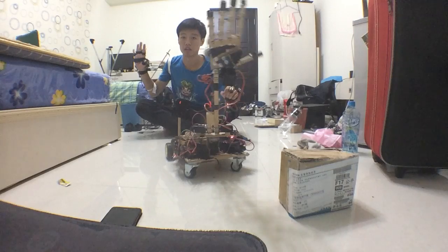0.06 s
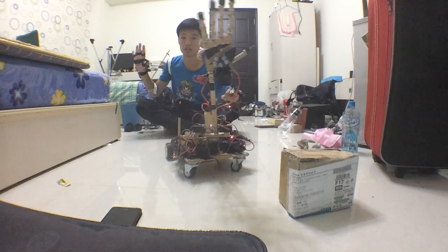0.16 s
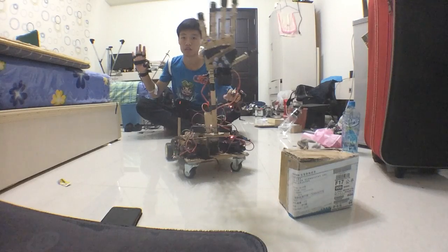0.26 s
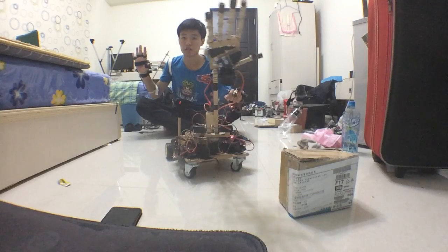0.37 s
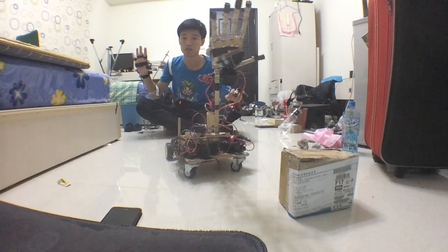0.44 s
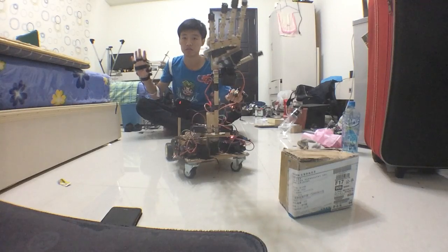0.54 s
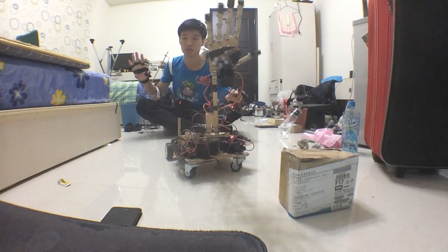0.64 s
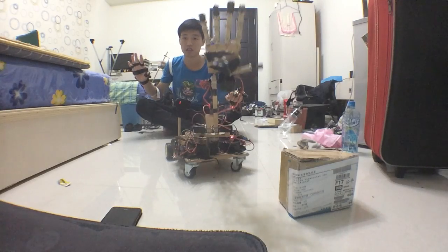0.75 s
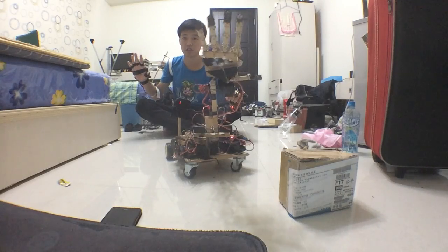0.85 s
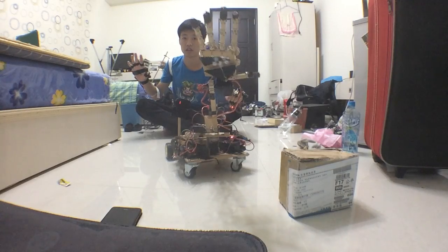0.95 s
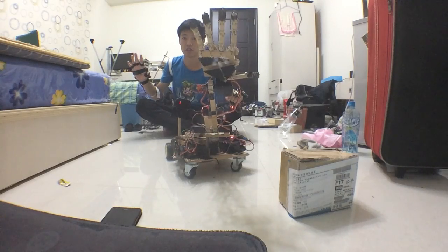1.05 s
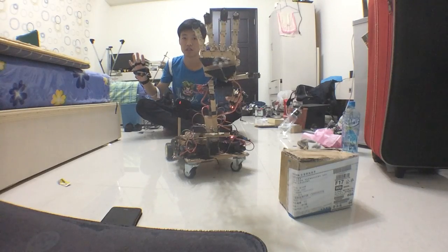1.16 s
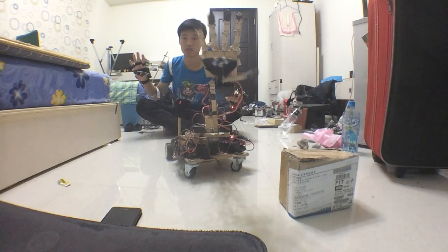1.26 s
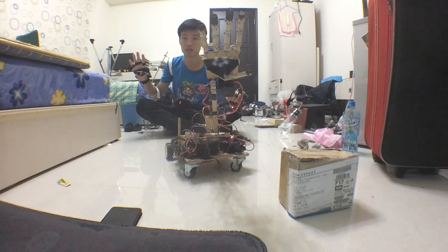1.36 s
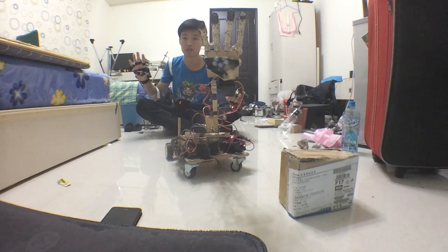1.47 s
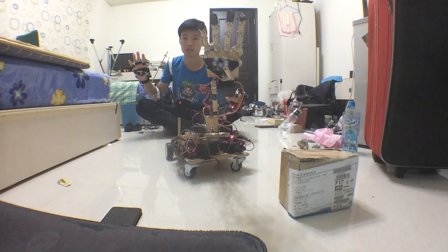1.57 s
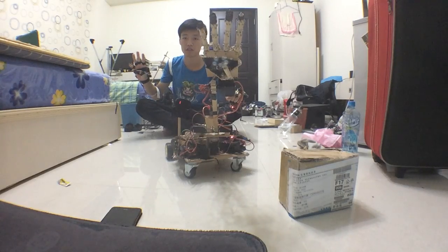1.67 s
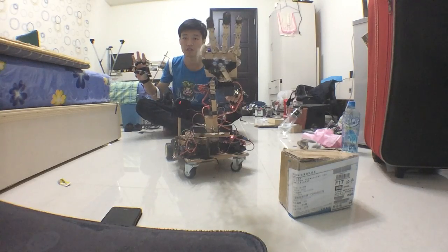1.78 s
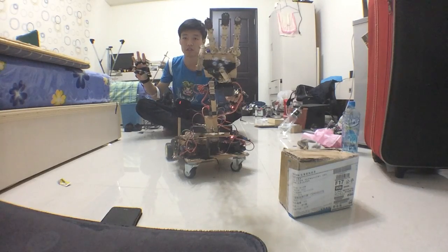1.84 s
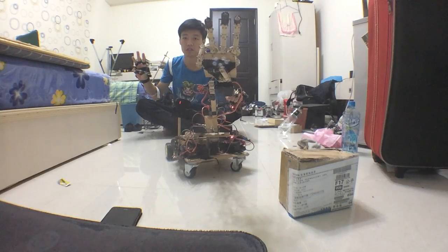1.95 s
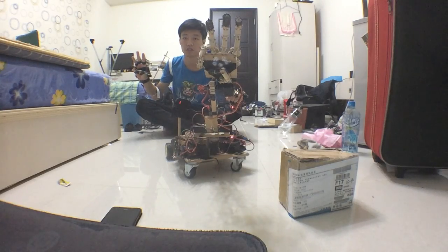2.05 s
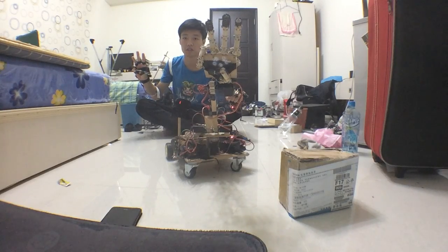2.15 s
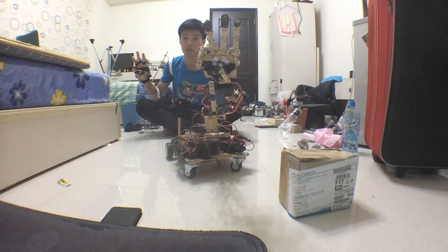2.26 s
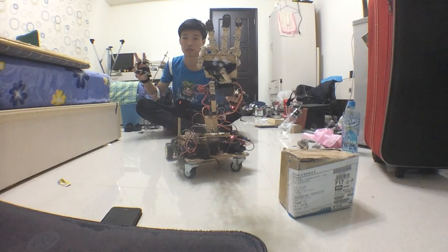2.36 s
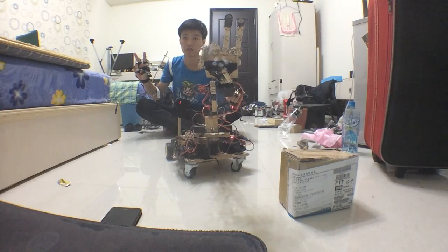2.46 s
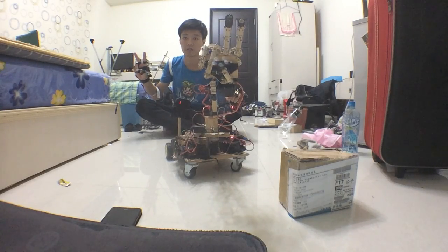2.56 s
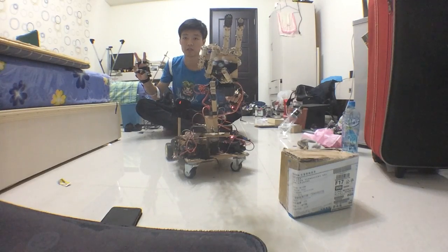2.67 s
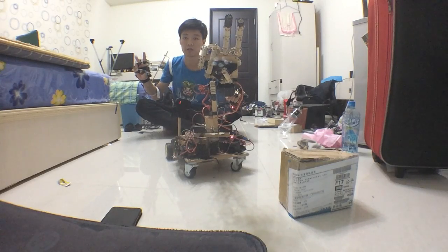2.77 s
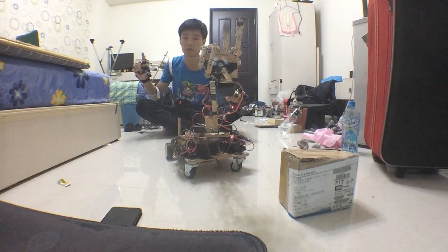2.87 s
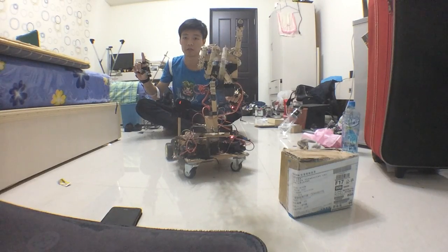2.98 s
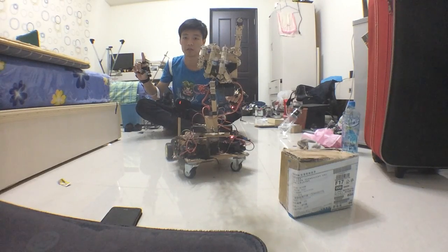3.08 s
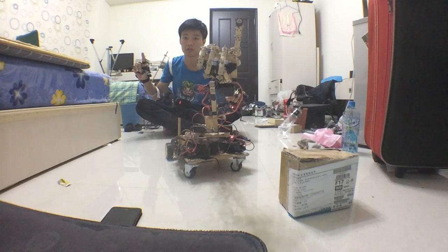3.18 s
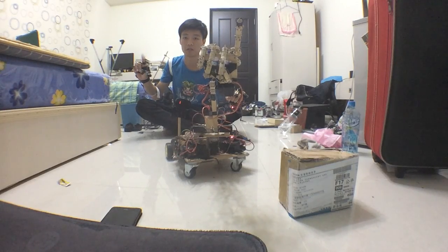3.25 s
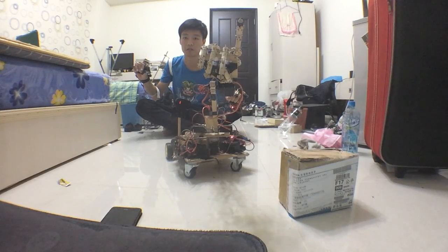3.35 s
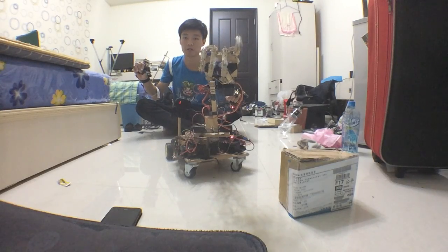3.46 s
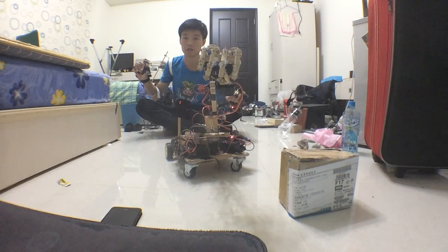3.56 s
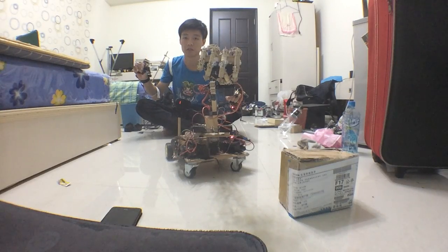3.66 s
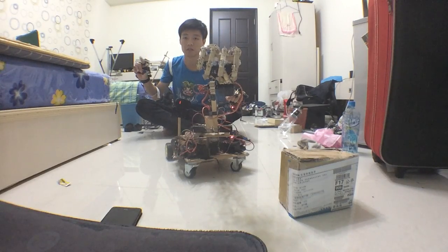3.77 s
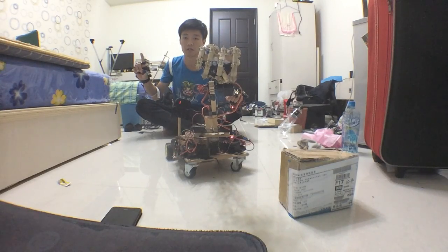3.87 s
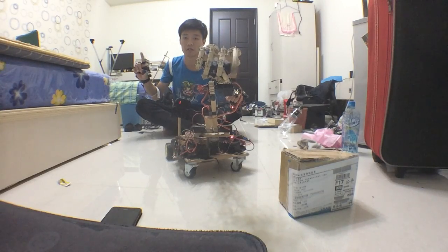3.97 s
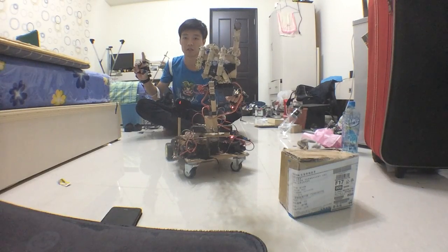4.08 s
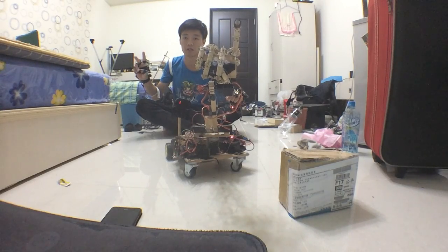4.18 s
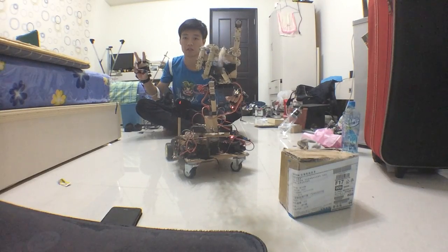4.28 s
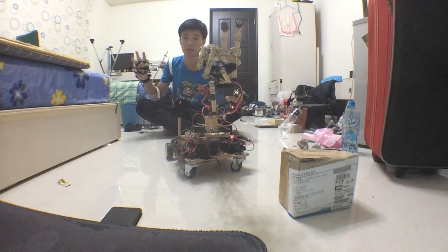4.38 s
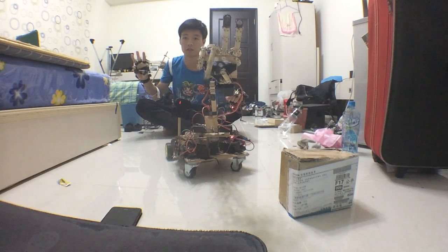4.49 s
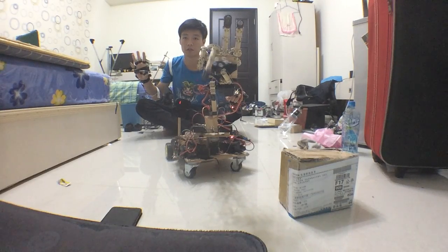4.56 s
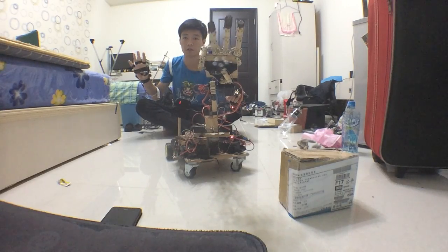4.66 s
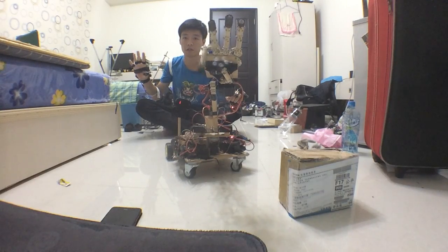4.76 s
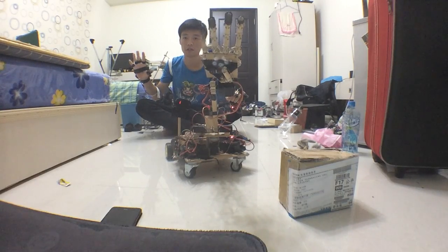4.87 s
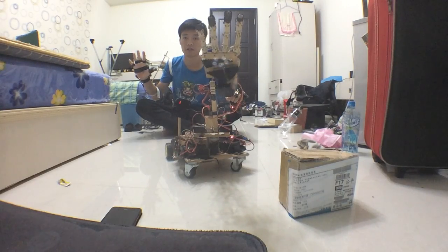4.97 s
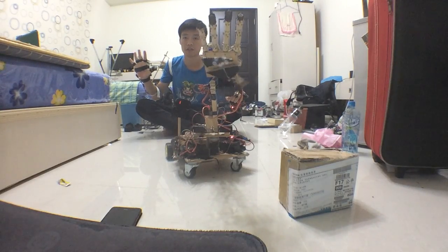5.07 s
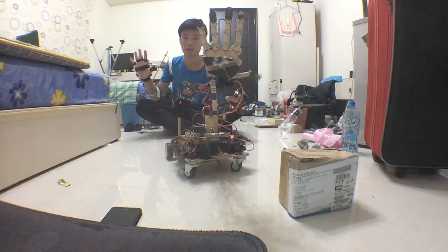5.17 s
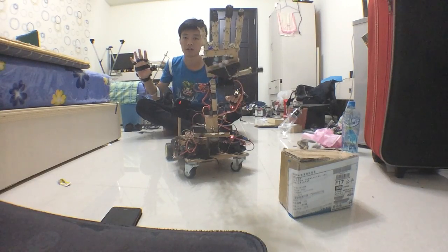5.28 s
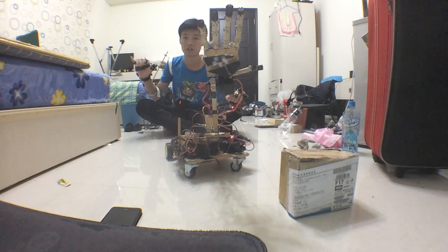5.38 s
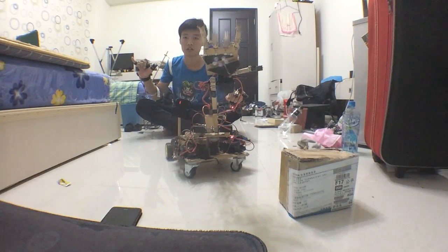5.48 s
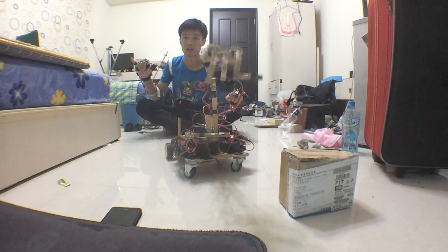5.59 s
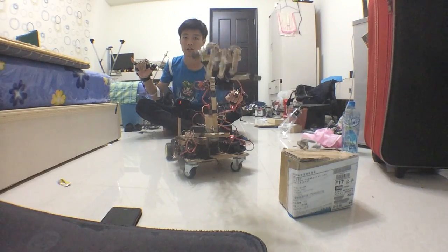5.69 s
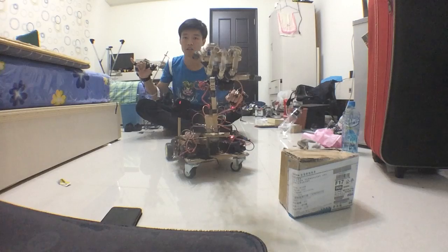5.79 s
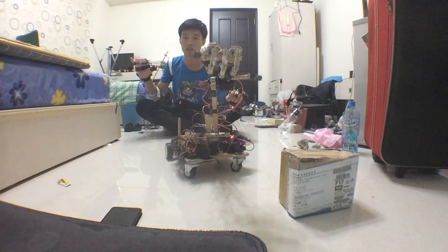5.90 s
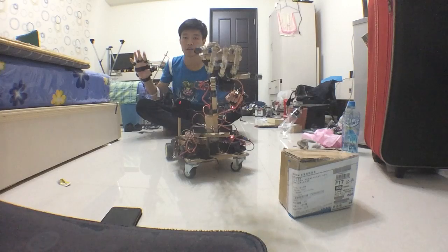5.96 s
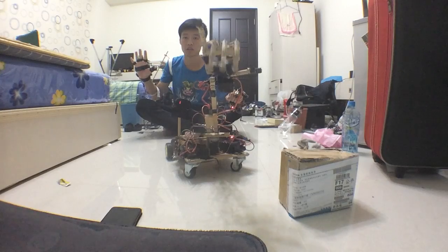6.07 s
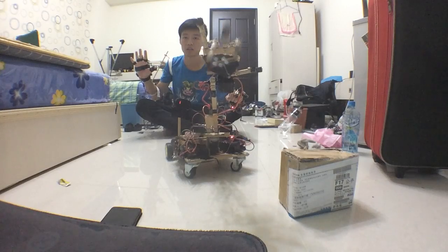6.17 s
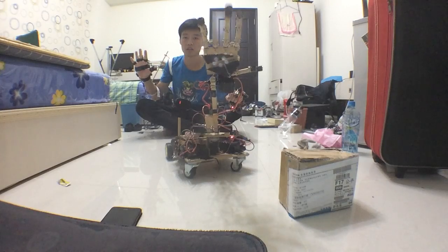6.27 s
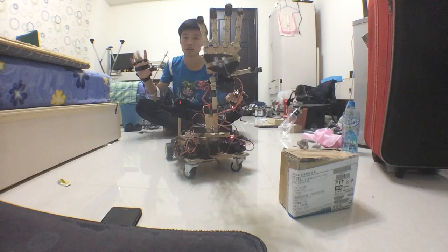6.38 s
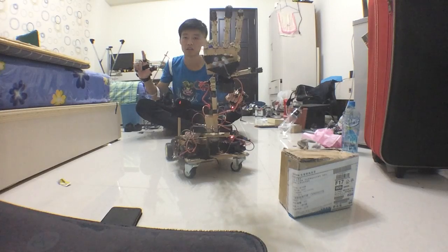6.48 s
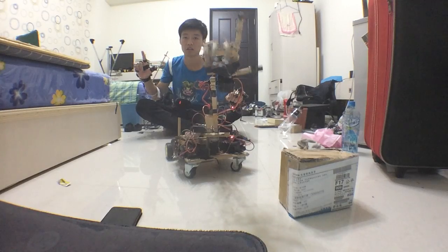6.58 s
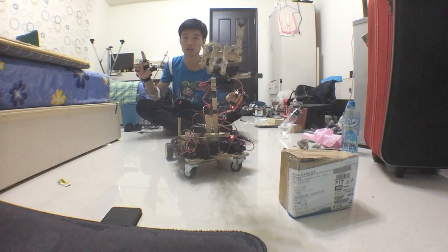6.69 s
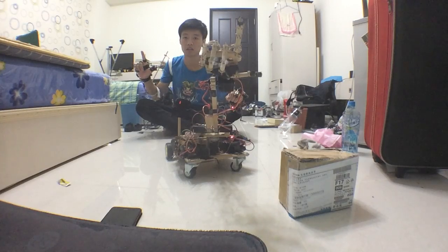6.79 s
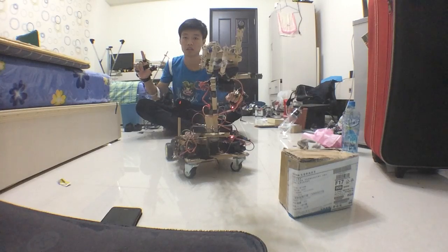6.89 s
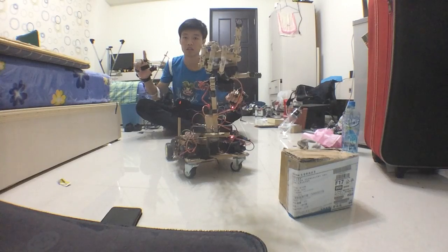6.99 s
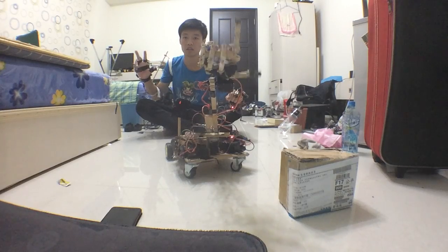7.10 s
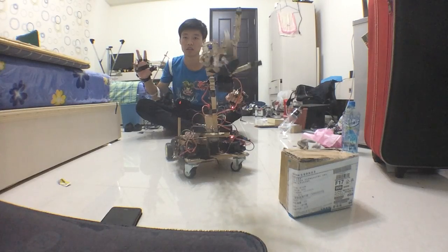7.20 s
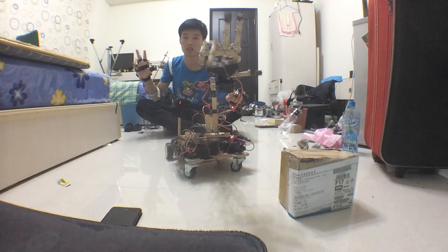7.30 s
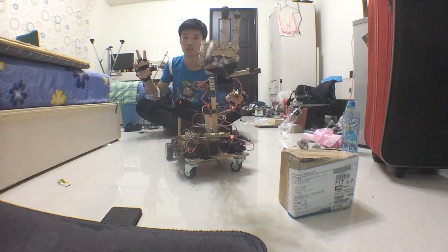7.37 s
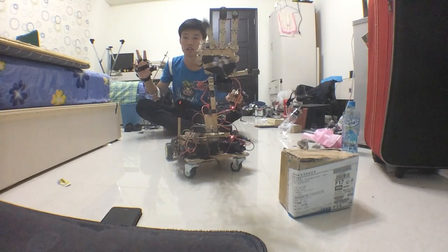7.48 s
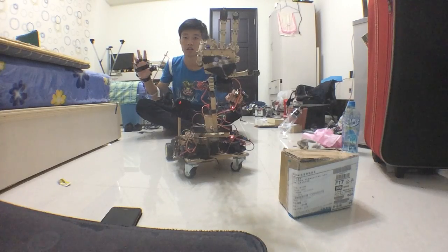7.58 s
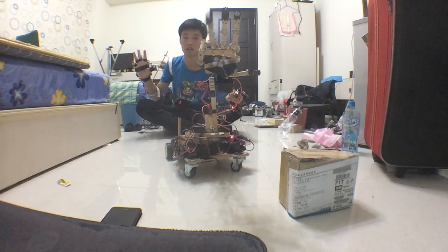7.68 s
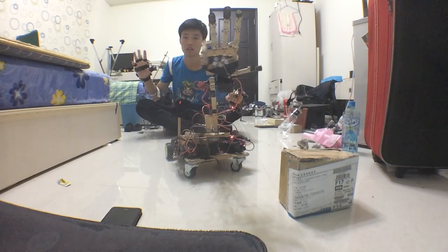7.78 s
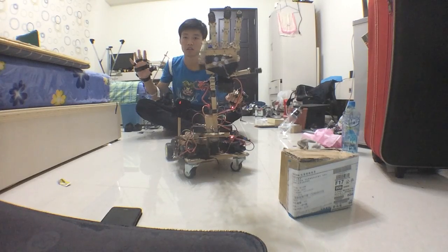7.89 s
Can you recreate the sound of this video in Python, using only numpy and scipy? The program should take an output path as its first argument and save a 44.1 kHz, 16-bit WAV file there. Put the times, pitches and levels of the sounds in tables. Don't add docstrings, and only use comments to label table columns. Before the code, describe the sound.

Small plastic servo gears chatter and whine in short irregular bursts, with sharp clicks and tiny squeaks, over a soft steady fan in a bedroom.

```python
import sys
import numpy as np
from scipy import signal
from scipy.fft import rfft, irfft, next_fast_len
from scipy.io import wavfile

SR = 44100
rng = np.random.default_rng(int(sys.argv[2]) if len(sys.argv) > 2 else 0)


def log_audio(samples):
    frames = np.atleast_2d(samples).T
    limited = np.clip(frames, -1, 1)
    pcm = np.round(limited * 32767).astype(np.int16)
    wavfile.write(sys.argv[1], SR, pcm)


def to_linear_factor(level_db):
    exponent = np.asarray(level_db, float) / 20
    return 10 ** exponent


N = 350154
ROTOR_HZ = 71.6


def rms_one(x):
    return x / np.sqrt(np.mean(x ** 2) + 1e-20)


def drift(rate):
    r = np.exp(-40 * np.pi * rate / SR)
    noise = rng.standard_normal(N // 20 + 2002)
    slow = signal.lfilter([1], [1, -2 * r, r * r], noise)[2000:]
    return np.interp(np.arange(N) / 20, np.arange(len(slow)), rms_one(slow))


def colour(x, spectrum):
    size, points = next_fast_len(N), np.array(spectrum)
    hz = np.maximum(np.fft.rfftfreq(size, 1 / SR), 1)
    curve_db = np.interp(np.log(hz), np.log(points[:, 0]), points[:, 1])
    return irfft(rfft(x, size) * to_linear_factor(curve_db), size)[:N]


def resonate(x, hz, width_hz):
    r = np.exp(-np.pi * width_hz / SR)
    top = (1 - r * r) / 2 * np.array([1, 0, -1])
    return signal.lfilter(top, [1, -2 * r * np.cos(2 * np.pi * hz / SR), r * r], x)


def band(x, low_hz, high_hz):
    return signal.sosfilt(signal.butter(3, [low_hz, high_hz], "band", fs=SR, output="sos"), x)


def swell(start, length, first_hz, last_hz, db, edge_db):
    u = np.linspace(0, 1, 9)
    glide_hz = first_hz + (last_hz - first_hz) * u
    return np.transpose([start + length * u, glide_hz, db - edge_db * (2 * u - 1) ** 2])


# pitch_hz, level_db (per Hz)
FAN_HISS = [(12, -29), (20, -12), (91, -2), (209, -16), (251, -10), (323, -13.5), (545, -15.5),
            (905, -15.5), (1030, -18), (1320, -21), (1500, -29), (1950, -56), (3300, -120)]
# pitch_hz, width_hz, level_db (rms)
FAN_HUMS = [
    (81.5, 9.3, -55.5),
    (117.1, 15, -63.5),
    (195.7, 26, -64),
    (520.7, 17.4, -68.5),
    (591, 14.3, -69.5),
]
# pitch_hz, level_db (per Hz)
FAN_UPPER_HISS = [(880, -17), (1500, -4), (2260, -7), (2910, -7.5), (3940, -6), (4300, -6.5), (4880, -8),
                  (7790, -13), (14100, -20.5), (15400, -17)]


def fan():
    hiss = colour(rng.standard_normal(N), FAN_HISS)
    hiss_db = -48.5 - 5.5
    hiss = to_linear_factor(hiss_db) * hiss / np.std(band(hiss, 20, 1100))
    hums = np.zeros(N)
    for hz, width_hz, db in FAN_HUMS:
        once = resonate(rng.standard_normal(N), hz, width_hz)
        hums += to_linear_factor(db) * rms_one(resonate(once, hz, width_hz))
    core_phase = 2 * np.pi * np.cumsum(196 + 0.813 * drift(1.8)) / SR
    core = to_linear_factor(-58 + 2.0 * drift(2.8)) * np.sin(core_phase)
    fizz = rms_one(colour(rng.standard_normal(N), FAN_UPPER_HISS))
    upper = to_linear_factor(-57.5 + 1.15 * drift(8)) * fizz
    return hiss + hums + core + upper


# start_s, length_s, first_hz, last_hz, peak_db
CLOTH = [
    (.02, 0.19, 630, 520, -55),
    (0.168, .13, 380, 310, -54),
    (.66, 0.161, 230, 300, -53),
    (0.721, 0.36, 579, 689, -55.5),
    (.98, .4, 350, 300.3, -59),
]


def rustle():
    out, s = np.zeros(N), np.arange(N) / SR
    lump = rms_one(band(rng.standard_normal(N), 10.0, 81))
    swish = rms_one(band(rng.standard_normal(N), 130, 1900))
    for row in CLOTH:
        times, hz, db = swell(*row, edge_db=9.5).T
        span = slice(int(times[0] * SR), int(times[-1] * SR))
        centre = np.sin(2 * np.pi * np.cumsum(np.interp(s[span], times, hz)) / SR)
        rub = .95 * lump[span] * centre + 0.66 * swish[span]
        out[span] += to_linear_factor(np.interp(s[span], times, db)) * rub
    return to_linear_factor(2.1 * drift(31)) * out


def bedroom(x):
    t60_s, room_db, wall_cut_hz = 0.4, -7.5, 7700
    size = next_fast_len(N + SR)
    w = 2 * np.pi * np.fft.rfftfreq(size)
    dull = 1 / np.sqrt(1 + (w * SR / (2 * np.pi * wall_cut_hz)) ** 2)
    tail = 0
    for k, lag in enumerate(rng.uniform(.011, .04, 12) * SR):
        loop = to_linear_factor(-60 * lag / SR / t60_s / dull) * np.exp(-1j * w * np.round(lag))
        tail = tail + (-1) ** k * loop / (1 - loop) / np.sqrt(12)
    bounce = to_linear_factor(-13.0) * np.exp(-1j * w * .0022 * SR)
    return irfft(rfft(x, size) * (1 + bounce + to_linear_factor(room_db) * tail), size)[:N]


# time_s, peak_db, ring_hz, low_part_db (relative)
JOINT_TICKS = [(0.5546, -46, 6300, -10), (1.0873, -33, 6030, -26), (1.6016, -23, 6080, -28),
               (1.645, -25, 6670, -28), (2.1077, -26, 5630, -31), (2.216, -37.5, 6570, -18),
               (2.353, -38.5, 5760, -21), (2.4202, -39, 5540, -17), (2.7581, -34, 5020, -23),
               (2.7994, -43, 5100, -19), (2.8654, -44, 6200, -14), (3.0894, -23, 6120, 3),
               (3.18, -33, 6070, -25), (3.4876, -24.5, 6400, -10), (4.583, -29, 4900, -24),
               (4.6239, -25, 4830, -29), (5.1082, -6.3, 4330, -31), (5.1892, -17.5, 7000, -16),
               (5.2489, -10, 4140, -28), (5.2913, -20, 6660, -22), (6.0544, -33, 6560, -19),
               (6.541, -41, 6210, -17), (6.908, -30, 5600, -12), (7.021, -42, 4700, -8),
               (7.0539, -40, 4200, -8), (7.073, -43, 4800, -8), (7.64, -39, 6600, -2),
               (7.6854, -39.5, 6150, -2), (7.729, -29, 6020, -19)]


def ticks():
    out, t = np.zeros(N), np.arange(800) / SR
    draws = rng.standard_normal((len(JOINT_TICKS), len(t)))
    scrape = np.minimum(t / 0.0006, 1) * np.exp(-t / 0.0012) + 0.13 * np.exp(-t / 0.011)
    for (start, db, hz, low_db), noise in zip(JOINT_TICKS, draws):
        contact = noise * scrape
        ring = resonate(contact, hz, 1330) + to_linear_factor(low_db) * band(contact, 2300, 4900)
        tip = .5 * resonate(contact, 6300, 1180) + 0.17 * band(contact, 11600, 12700)
        ring = band(ring + to_linear_factor(0.5 * (db - 4)) * tip, 1900, 14500)
        at = int((start + .0005) * SR)
        out[at:at + len(t)] += to_linear_factor(db) * ring / np.abs(ring).max()
    return out


# middle_s, length_s, first_hz, last_hz, peak_db
CORD_SQUEAKS = [(3.044, 0.00695, 2000, 2270, -29.5), (3.046, .03, 1700, 1750, -44),
                (3.089, 0.02, 2900, 2530, -33), (3.115, 0.016, 2750, 2700, -45),
                (5.606, .02, 1100, 2400, -45), (5.618, 0.021, 1820, 2360, -34),
                (5.661, .014, 2740, 2300, -34.5), (5.566, .02, 4000, 3850, -31.5),
                (6.679, 0.02, 1810, 2330, -33.5), (6.723, 0.013, 2600, 2820, -33.5),
                (6.749, 0.013, 2400, 2800, -41), (6.664, .02, 4300, 3600, -36),
                (4.45, 0.13, 1230, 1000, -52), (4.72, 0.069, 2720, 2700, -52.5)]


def squeaks():
    out = np.zeros(N)
    for middle, length, first_hz, last_hz, db in CORD_SQUEAKS:
        n = int(length * SR)
        tone = np.sin(2 * np.pi * np.cumsum(np.linspace(first_hz, last_hz, n)) / SR)
        at = int((middle - length / 2) * SR)
        out[at:at + n] += to_linear_factor(db) * np.hanning(n) * tone
    return out * to_linear_factor(2.5 * drift(45))


# start_s, length_s, first_hz, last_hz, peak_db
SHORT_WHINES = [(2.96, .06, 3180, 3200, -43), (3.1, .05, 4040, 3950, -35.5),
                (3.135, 0.066, 3260, 3500, -42), (4.5, .18, 2380, 2430, -37),
                (4.63, .08, 3930, 3970, -38.5), (2.5, .22, 3330, 3200, -45), (5.72, .13, 3120, 2970, -44),
                (6.77, .06, 3160, 3110, -47), (2.52, .23, 1890, 1790, -52.5), (4.8, .2, 1930, 1900, -56),
                (5.54, .17, 1950, 1930, -45), (7.25, 0.14, 1940, 1930, -43.5), (3.94, .33, 1740, 1670, -54),
                (3.48, .28, 1680, 1640, -59), (1.3, .36, 2330, 2330, -45), (4.07, .13, 5150, 5050, -52),
                (3.465, .085, 3200, 3280, -41), (3.54, .09, 3650, 3800, -50), (3.68, .06, 3700, 3650, -53)]
# time_s, pitch_hz, level_db
LONG_WHINE = [
    (3.94, 3200, -53),
    (3.99, 3650, -51),
    (4.05, 3560, -43.5),
    (4.16, 3310, -46.5),
    (4.2, 3100, -46),
    (4.25, 2950, -55),
]


def whines():
    out, s = np.zeros(N), np.arange(N) / SR
    waver, flicker = 1 + .026 * drift(450), to_linear_factor(4 * drift(70))
    glides = [(swell(*row, edge_db=13.5), -23.5) for row in SHORT_WHINES] + [(LONG_WHINE, -17)]
    for rows, side_db in glides:
        times, hz, db = np.transpose(rows)
        span = slice(int(times[0] * SR), int(times[-1] * SR))
        phase = 2 * np.pi * np.cumsum(np.interp(s[span], times, hz) * waver[span]) / SR
        tone = np.sin(2 * phase) + to_linear_factor(side_db) * (np.sin(phase) + 2 * np.sin(3 * phase))
        out[span] += np.sqrt(2) * to_linear_factor(np.interp(s[span], times, db)) * tone
    return out * flicker * to_linear_factor(3.6 * np.sin(2 * np.pi * ROTOR_HZ * s))


# spin_up_s, frame_db, case_db, tooth_tips_db (all relative), frame_easing_db
SERVO_TONES = [
    (.02, 2, -2.5, -9.5, 0),
    (.02, -6.5, -6, -16, -1),
    (.022, -14.5, -7, -5, 3),
    (.03, -11, 5.5, -1.5, 2),
    (.03, -7, -5, -5.5, 1.5),
    (.04, -12, -5.5, -2, -0.5),
    (.06, -4.5, -2, -2.5, 7.5),
]
# start_s, stop_s, first_db, last_db, coast_s
WRIST_MOVES = [(0.048, 0.204, -52.5, -47, .05), (.2, 0.472, -56.5, -56, 0.12), (0.543, .57, -51, -53, 0.11),
               (0.604, .64, -54, -50.5, 0.17), (5.305, 5.497, -50.5, -59, .05)]
# start_s, stop_s, first_db, last_db, coast_s
ARM_MOVES = [(0, .05, -53, -53, .1), (.55, .72, -58, -53, .03), (0.716, 0.884, -40.5, -44, .22),
             (3.35, 3.45, -66, -64, .05), (3.45, 3.48, -53, -48, .03), (3.86, 3.92, -65, -60, .05),
             (5.99, 6.037, -60, -57, .03), (6.045, 6.074, -39, -45, .03), (6.51, 6.56, -53, -51, .03),
             (7.1, 7.183, -64, -60, .03), (7.18, 7.2, -55, -52, .02), (7.62, 7.718, -60, -58, .03)]
# start_s, stop_s, first_db, last_db, coast_s
THUMB_MOVES = [(1.294, 1.635, -34, -41.5, 0.045), (1.387, 1.43, -35.5, -35, 0.11),
               (1.792, 1.85, -43, -47, .05), (2.1, 2.114, -37, -39, .04), (3.06, 3.186, -39.5, -33, .012),
               (4.632, 4.695, -35.5, -36.5, 0.12), (5.104, 5.3, -35.5, -31, .012),
               (5.68, 5.8, -38, -40, .08), (6.25, 6.38, -40, -37, .1), (6.718, 6.81, -39, -38.5, .12),
               (7.336, 7.47, -41, -42, .08)]
# start_s, stop_s, first_db, last_db, coast_s
INDEX_MOVES = [(1.8, 1.86, -50, -52, .05), (1.97, 2.09, -50, -47, .03), (2.5, 2.739, -42, -42.5, .07),
               (2.952, 3.103, -44.5, -44, .1), (4.357, 4.67, -45, -40, .06), (6.2, 6.31, -45, -43, .08),
               (7.398, 7.467, -45, -43, 0.046)]
# start_s, stop_s, first_db, last_db, coast_s
MIDDLE_MOVES = [(2.946, 3.185, -41, -40, .012), (3.468, 3.728, -44.5, -48, .14),
                (4.326, 4.555, -38.5, -40.5, .2), (7.718, 7.835, -45, -48, 0.19)]
# start_s, stop_s, first_db, last_db, coast_s
RING_MOVES = [(1.79, 2.088, -44, -42, 0.028), (3.902, 3.997, -50.5, -48, .1),
              (3.974, 4.201, -43.5, -42, 0.15), (4.255, 4.35, -45, -41, .1), (4.714, 5.11, -47, -44, .02),
              (4.86, 4.99, -43, -42, .15)]
# start_s, stop_s, first_db, last_db, coast_s
GRIP_MOVES = [(5.496, 5.818, -37.5, -39, .13), (6.062, 6.386, -39.5, -35, 0.13),
              (6.547, 6.803, -38.5, -38, .2), (6.777, 6.906, -42.5, -44, 0.17),
              (7.197, 7.503, -38, -38.5, .12), (7.73, 7.85, -47, -49, .1)]


def effort():
    spin_up_db, coast_db = 15, 29
    settle_db, settle_db_per_s = -25, 70
    steady_frame, steady_case = 0.24, .03
    tips_let_go = 0.11
    ease_from = 0.57
    s, power = np.arange(N) / SR, np.full((4, N), 1e-9)
    all_moves = (WRIST_MOVES, ARM_MOVES, THUMB_MOVES, INDEX_MOVES, MIDDLE_MOVES, RING_MOVES, GRIP_MOVES)
    for (spin, frame_db, case_db, tips_db, ease_db), moves in zip(SERVO_TONES, all_moves):
        for start, stop, first_db, last_db, coast in moves:
            span = slice(max(int(start * SR), 0), int((stop + .5) * SR))
            t, after = s[span], np.maximum(s[span] - stop, 0)
            up_to_speed = start + min(spin, stop - start - .001)
            run = np.interp(t, [start, up_to_speed, stop], [first_db - spin_up_db, first_db, last_db])
            fall = np.maximum(-coast_db * after / coast, settle_db - settle_db_per_s * after)
            train = run + fall
            lag = max(first_db, last_db) - train
            ease = np.interp(t, [start + ease_from * (stop - start), stop], [0, ease_db])
            frame = train + frame_db + steady_frame * lag - ease
            case = train + case_db + steady_case * lag
            tips = train + tips_db + tips_let_go * (train - run)
            power[:, span] += to_linear_factor([frame, case, train, tips]) ** 2
    return np.sqrt(power)


# pitch_hz, softness_hz
HANDOVERS = [
    (4420, 150),
    (5600, 320),
    (8200, 830),
]


def parts(x):
    size = next_fast_len(N)
    hz, whole = np.fft.rfftfreq(size, 1 / SR), rfft(x, size)
    steps = [.5 + .5 * np.tanh((hz - edge) / soft) for edge, soft in HANDOVERS]
    above = [1] + steps + [0]
    return [irfft(whole * (a - b), size)[:N] for a, b in zip(above, above[1:])]


# pitch_hz, level_db (per Hz)
TOOTH_CHATTER = [(530, -59), (900, -20.5), (1590, -17.5), (2090, -11.5), (3140, -8), (3840, -4.5),
                 (4370, -5.5), (4750, -8), (6170, -5.5), (8510, -8.5), (11300, -9.5), (13700, -17),
                 (15400, -32)]
# pitch_hz, width_hz, level_db
CASE_RINGS = [(1194, 120, 5), (2650, 360, -10), (3900, 570, 0), (4900, 110, -0.5), (5500, 180, 0),
              (6210, 740, 5.5), (6600, 124, -4), (7340, 265, -1.5), (8000, 260, -20.5), (9670, 550, -12),
              (10900, 380, -9)]


def gears():
    teeth_per_s = 4000
    sizes = to_linear_factor(1.87 * np.minimum(rng.exponential(1, N), 5)) * rng.choice([-1, 1], N)
    teeth = sizes * (rng.random(N) < teeth_per_s / SR)
    turn = 2 * np.pi * np.cumsum(ROTOR_HZ * (1 + 0.0493 * drift(4.2))) / SR
    throb = to_linear_factor(1.1 * np.sin(turn) + 0.95 * drift(30.0) + 0.62 * drift(100))
    rub = 0.85 * rng.standard_normal(N)
    drive = throb * colour(rms_one(teeth) + rub, TOOTH_CHATTER)
    body = 1.16 * drive
    for hz, width_hz, db in CASE_RINGS:
        body += to_linear_factor(db + 4.5 * drift(11)) * resonate(drive, hz, width_hz)
    frame_gain, case_gain, train_gain, tips_gain = effort()
    frame, case, train, tips = map(rms_one, parts(body))
    light = np.clip((-44 - 20 * np.log10(train_gain)) / 8, 0, .55)
    frame = (1 - light) * frame + light * rms_one(band(frame, 1180, 3670))
    return to_linear_factor(-1.0) * (train_gain * train + frame_gain * frame + case_gain * case + tips_gain * tips)


def scene():
    hand = gears() + whines() + squeaks() + ticks()
    return np.tile(bedroom(hand) + fan() + rustle(), (2, 1))


def band_limit(x):
    return signal.sosfilt(signal.butter(12, 15570, fs=SR, output="sos"), x)


def record(dry):
    cut = signal.sosfilt(signal.cheby2(14, 60, 15950, fs=SR, output="sos"), dry)
    return band_limit(cut)


dry = scene()
out = record(dry)
log_audio(out)
```